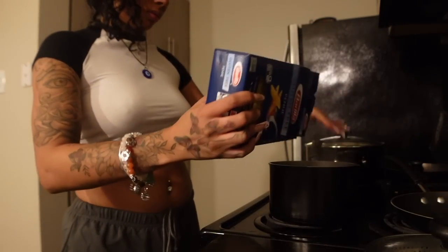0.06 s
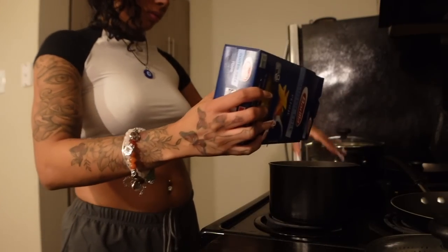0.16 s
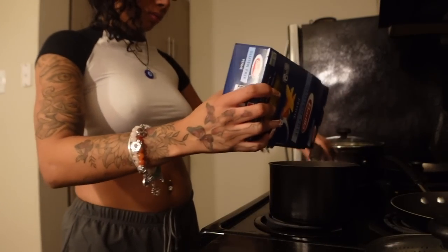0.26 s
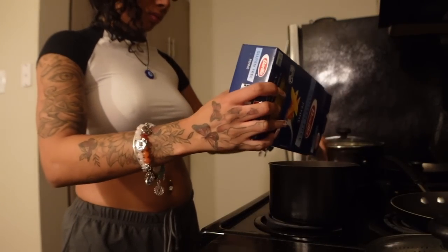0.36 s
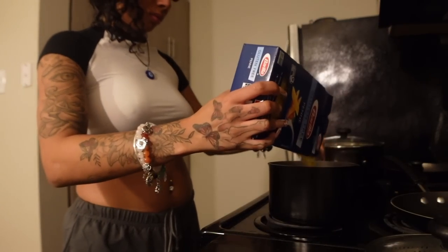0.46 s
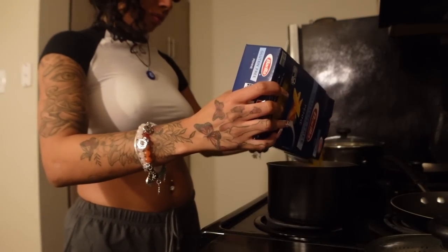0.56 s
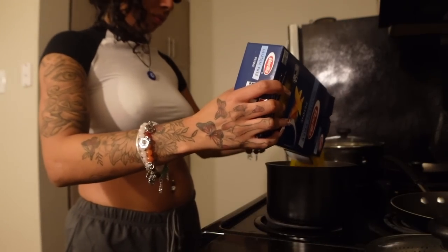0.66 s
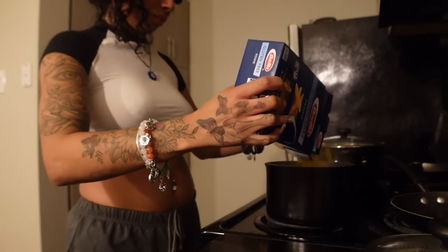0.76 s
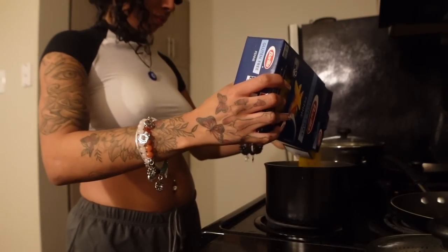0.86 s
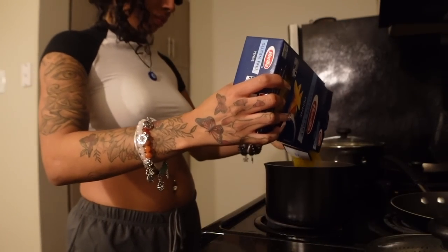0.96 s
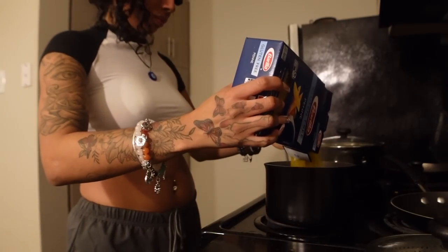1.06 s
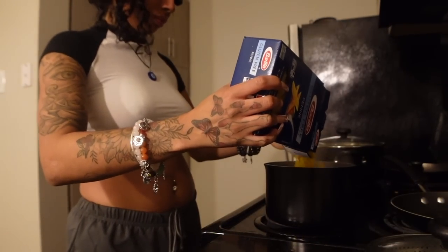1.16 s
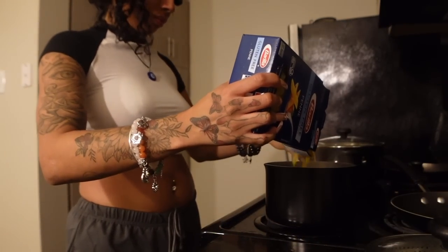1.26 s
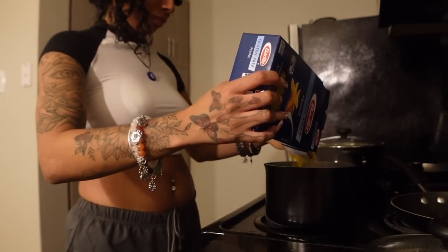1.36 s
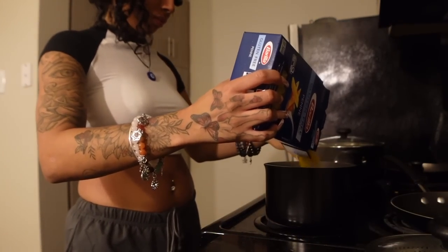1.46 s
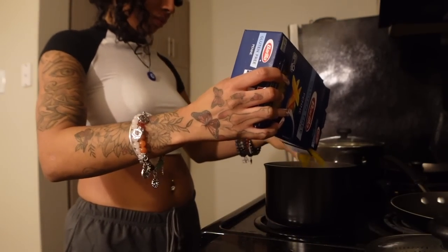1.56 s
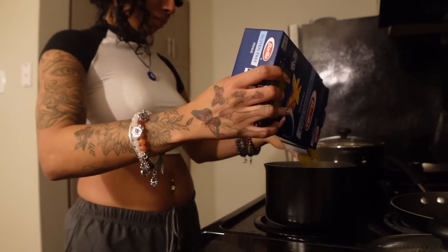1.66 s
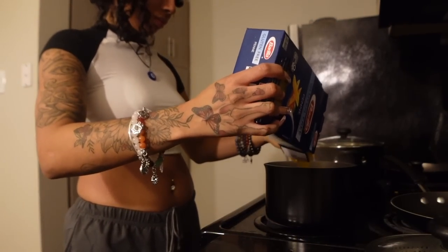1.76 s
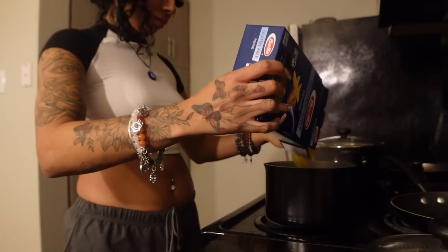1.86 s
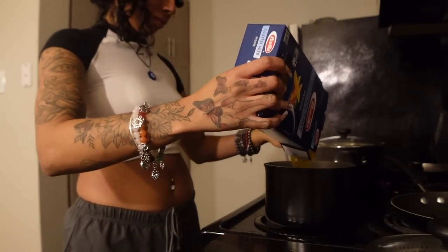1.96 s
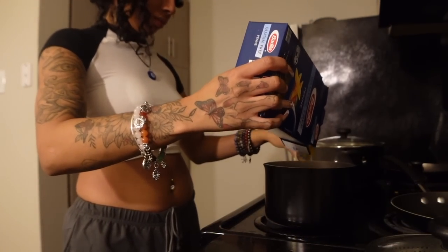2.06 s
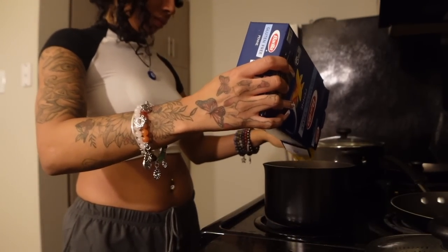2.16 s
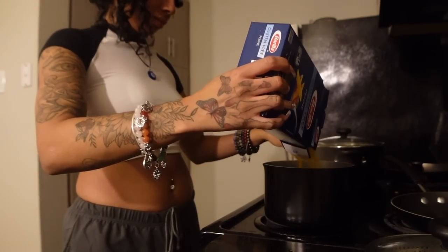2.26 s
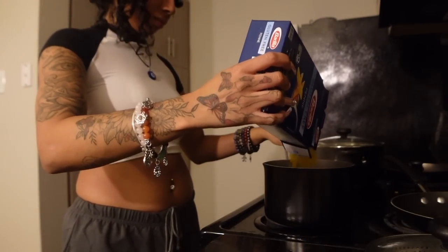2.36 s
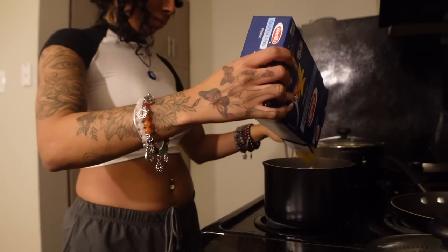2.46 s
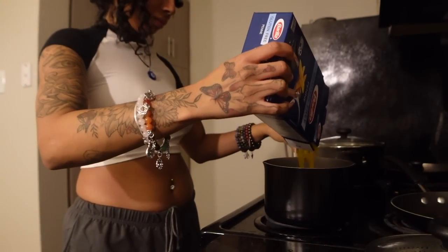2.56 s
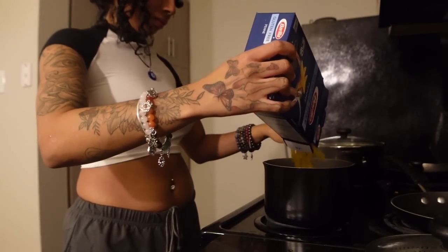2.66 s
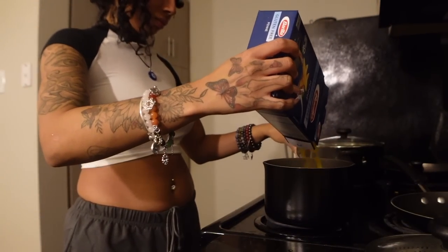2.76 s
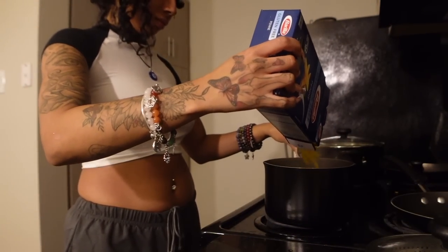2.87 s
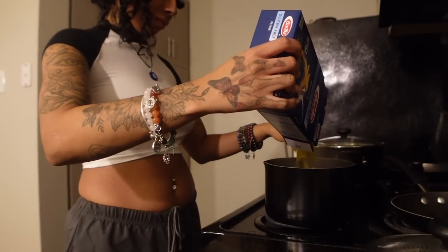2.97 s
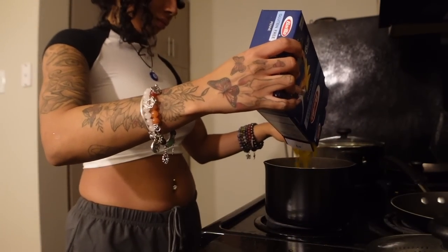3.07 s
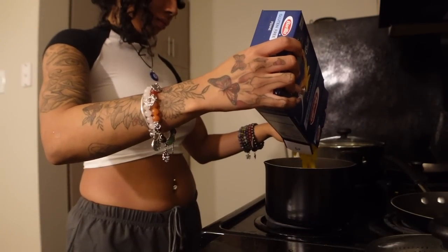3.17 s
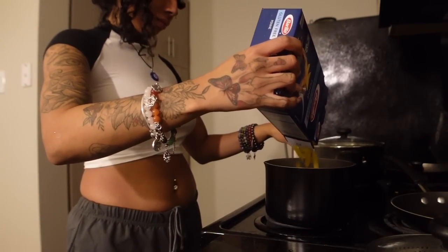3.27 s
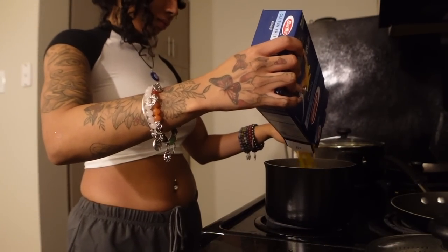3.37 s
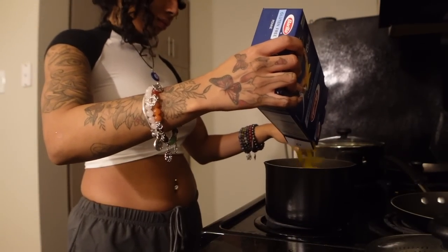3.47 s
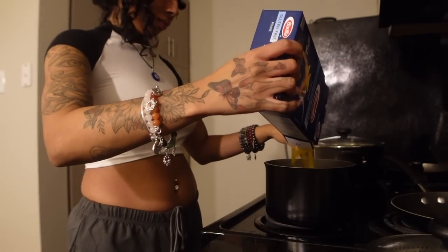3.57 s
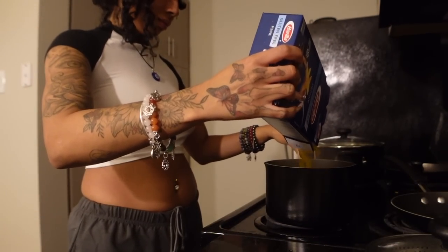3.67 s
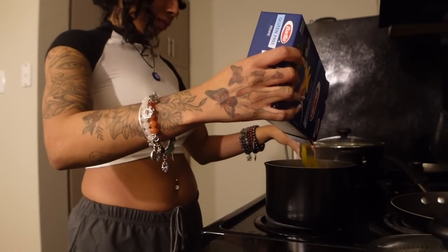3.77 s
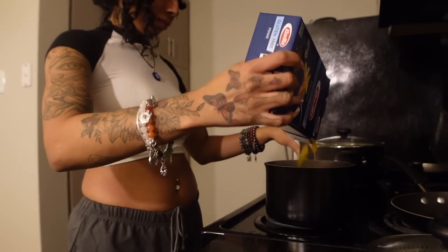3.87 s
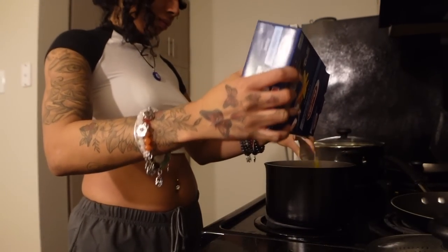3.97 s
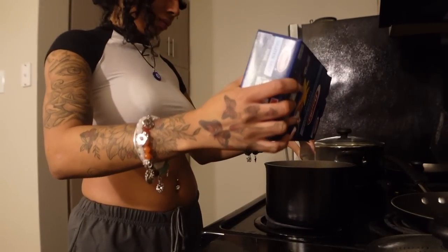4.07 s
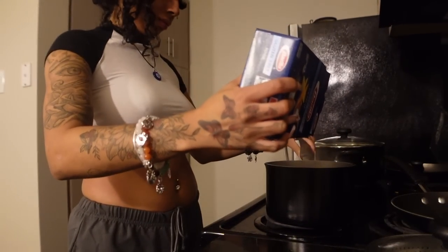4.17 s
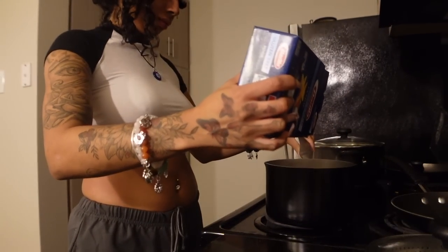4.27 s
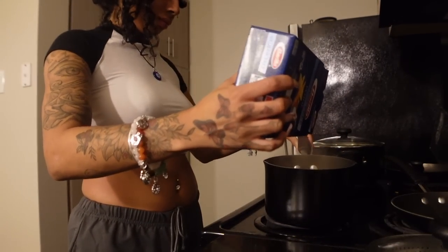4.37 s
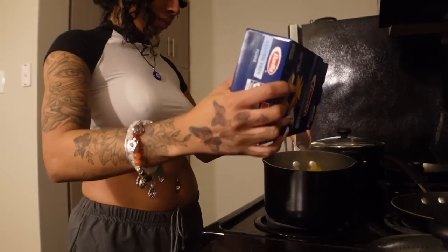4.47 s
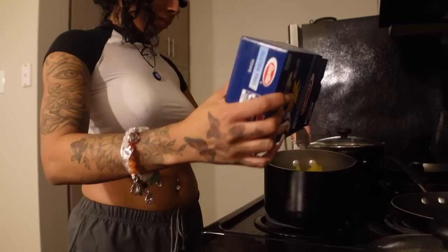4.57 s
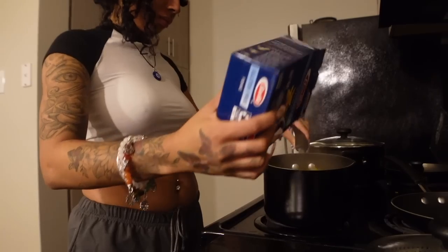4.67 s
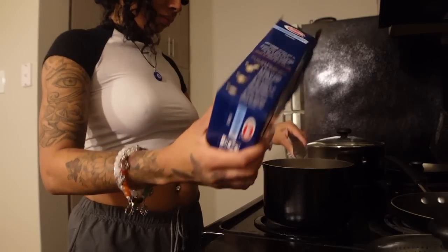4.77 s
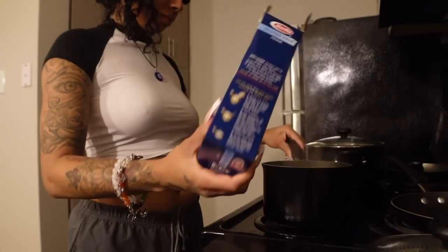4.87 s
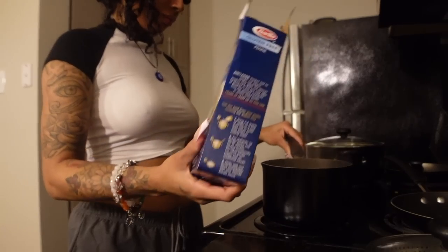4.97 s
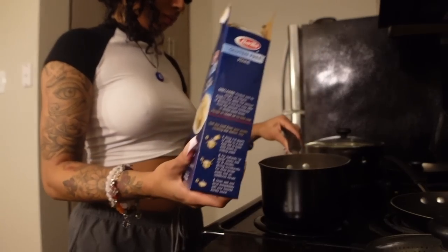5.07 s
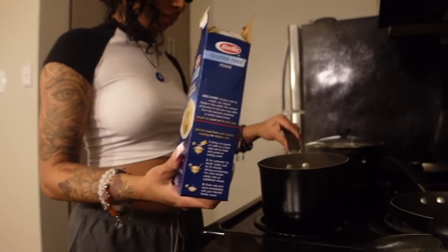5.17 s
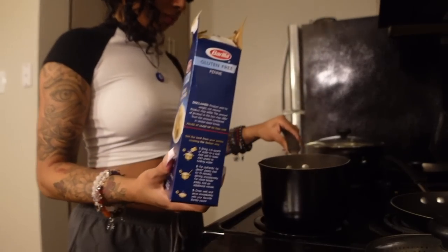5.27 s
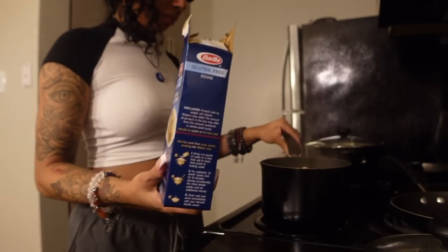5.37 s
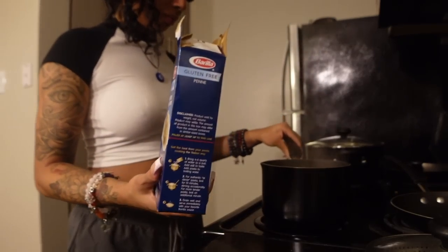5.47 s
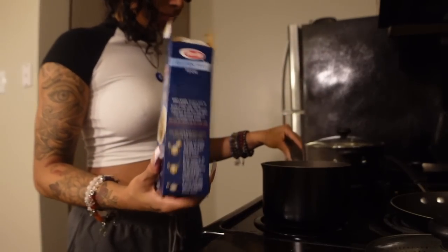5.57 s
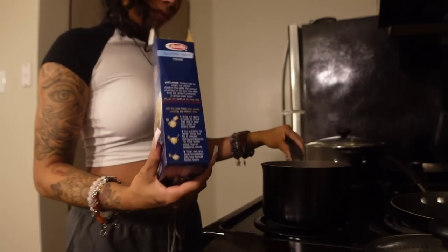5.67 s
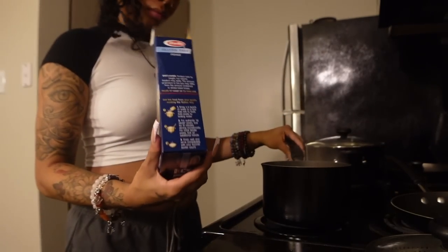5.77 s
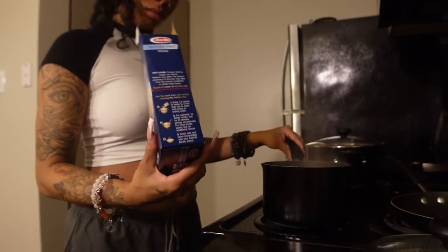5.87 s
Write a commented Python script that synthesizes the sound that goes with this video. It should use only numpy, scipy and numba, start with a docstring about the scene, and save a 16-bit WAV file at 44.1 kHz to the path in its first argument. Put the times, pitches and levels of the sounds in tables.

```python
"""A low kitchen hum and a light knock, then dry pasta is tipped from a cardboard box into a steel pot on a stove;
the box is turned upright and the rest slides back.
Hundreds of small random contacts, each a click and a few damped partials, ring through the box's resonances.
Noise ticks and tube tones clink in the pot and excite its damped modes; knocks, skids and pings stand out singly.
Random decaying echoes give the small kitchen; two close capsules hear the sources a little to the right."""
import sys
import numpy as np
from scipy import signal
from scipy.fft import rfft, irfft
from scipy.io import wavfile
from numba import njit

SR = 44100
rng = np.random.default_rng(int(sys.argv[2]) if len(sys.argv) > 2 else 0)


def master_out(mix):
    """Clip the mix to full scale and print it as 16-bit PCM to the path in sys.argv[1]."""
    frames = np.transpose(np.atleast_2d(mix))
    ceiling = np.clip(frames, -1, 1)
    pcm = np.round(ceiling * 32767).astype(np.int16)
    wavfile.write(sys.argv[1], SR, pcm)


N = 261513


def undb(db):
    """Decibels to gain."""
    return 10 ** (np.asarray(db) / 20)


def rms(x):
    """Root mean square, kept above zero."""
    return np.sqrt(np.mean(x ** 2)) + 1e-12


def curve(rows, column):
    """One dB column of a table as a gain over time, fading to silence outside it."""
    rows, t = np.asarray(rows), np.arange(N) / SR
    outside_s = np.maximum(rows[0, 0] - t, 0) + np.maximum(t - rows[-1, 0], 0)
    return undb(np.interp(t, rows[:, 0], rows[:, column])) * np.exp(-outside_s / .02)


def band(x, lo_hz, hi_hz):
    """Third-order Butterworth band-pass."""
    edges_hz = [lo_hz, min(hi_hz, .48 * SR)]
    return signal.sosfilt(signal.butter(3, edges_hz, 'bandpass', fs=SR, output='sos'), x)


def convolve(x, impulse_response):
    """Play a sound through an impulse response."""
    return signal.fftconvolve(x, impulse_response)[:N]


def response(points, resonances=(), size=8192):
    """Minimum-phase impulse response of a broad spectrum with resonant peaks and dips on it."""
    f = np.maximum(np.arange(size // 2 + 1) * SR / size, 1)
    hz, db = np.transpose(points)
    shape_db = np.interp(np.log(f), np.log(hz), db)
    for centre_hz, width_hz, height_db in resonances:
        shape_db = shape_db + height_db / (1 + (2 * (f - centre_hz) / width_hz) ** 2)
    # folding the cepstrum makes the response causal
    cepstrum = irfft(np.log(undb(shape_db)))
    cepstrum[1:size // 2] *= 2
    cepstrum[size // 2 + 1:] = 0
    return irfft(np.exp(rfft(cepstrum)))


def colour(x, points, resonances=()):
    """Filter by a spectrum and its resonances."""
    return convolve(x, response(points, resonances))


@njit
def rings(at, hz, fade, size, length):
    """A damped sine for each row; fade is the time constant in seconds."""
    out = np.zeros(length)
    for k in range(len(at)):
        start = max(int(at[k] * SR), 0)
        z = size[k] + 0j
        turn = np.exp((2j * np.pi * hz[k] - 1 / fade[k]) / SR)
        for i in range(start, min(length, start + int(6 * fade[k] * SR))):
            z *= turn
            out[i] += z.imag
    return out


def bursts(at, size, fade_s):
    """A short decaying burst of noise at each time."""
    hits = np.zeros(N)
    np.add.at(hits, np.clip((at * SR).astype(int), 0, N - 1), size)
    envelope = signal.lfilter([1], [1, -np.exp(-1 / (fade_s * SR))], hits)
    return envelope * rng.standard_normal(N)


def struck(at, hz, size, modes, fade_s, contact_s, scatter=0.076):
    """A few quickly damped modes for each blow; they swell during contact and vary a little from spot to spot."""
    ratio, db = np.transpose(modes)
    chance = rng.standard_normal((len(at), 2, len(ratio)))
    starts = np.repeat(at, len(ratio))
    # the mode at the pitch itself stays put
    pitches = (np.outer(hz, ratio) * (1 + scatter * chance[:, 0] * (ratio != 1))).ravel()
    sizes = (np.outer(size, undb(db)) * np.sign(chance[:, 1])).ravel()
    fading = rings(starts, pitches, np.full(len(starts), fade_s), sizes, N)
    held = rings(starts, pitches, np.full(len(starts), contact_s), sizes, N)
    return fading - held


def contacts(rate, spread_db, cycles, click, count=18000, order=5):
    """Random collisions, white and of even power: each is a click and a few short partials of a hollow piece."""
    gaps, strength = rng.exponential(size=count), rng.standard_normal(count)
    pitch, sign = rng.random((count, order)), rng.choice([-1., 1.], (count, order))
    at = np.searchsorted(np.cumsum(rate) / SR, np.cumsum(gaps))
    heard = at < N
    at, pitch, sign = at[heard], pitch[heard], sign[heard]
    # dense collisions are each weaker, so power stays even
    size = undb(spread_db * np.minimum(strength[heard], 2)) / np.sqrt(rate[at])
    hz = 250 * 64 ** pitch
    fade_s = np.minimum(cycles / hz, .006)
    sizes = sign * size[:, None] * np.sqrt(hz / fade_s)
    partials = rings(np.repeat(at / SR, order), hz.ravel(), fade_s.ravel(), sizes.ravel(), N)
    clicks = np.bincount(at, size * sign[:, 0], N)
    return partials / rms(partials) + click * clicks / rms(clicks)


# Appliance noise spectrum. Each row: frequency in Hz, relative density in dB per Hz.
KITCHEN_SPECTRUM = [(25, -28), (38, -27), (48, -6), (62, -29), (80, -6), (105, 0), (200, 3.5), (300, -5),
                    (400, -0.5), (600, -13), (950, -12), (1500, -7), (2200, -17), (5000, -29), (15000, -48)]
# Hum partials. Each row: frequency in Hz, level in dB rms.
HUM_PARTIALS = [(118.6, -50), (238, -53.5), (377, -59.5), (1556, -63)]


def background(noise_db=-42.5, side_db=-19):
    """Steady appliance noise with a slightly wavering mains hum."""
    mid, side = (colour(rng.standard_normal(N), KITCHEN_SPECTRUM) for _ in range(2))
    t, hum = np.arange(N) / SR, np.zeros(N)
    for hz, db in HUM_PARTIALS:
        waver_rad = np.cumsum(rng.standard_normal(N)) * 0.00068 * np.sqrt(hz)
        hum += undb(db) * np.sqrt(2) * np.sin(2 * np.pi * hz * t + waver_rad)
    opposed = side / rms(side) * np.array([[1], [-1]])
    return hum + undb(noise_db) * (mid / rms(mid) + undb(side_db) * opposed)


def room(x, early_db, tail_db, early_s=0.0065, low_t60=0.86, high_t60=0.65, count=32):
    """Quick echoes off stove and wall, then the kitchen's short tail; their pattern changes as box and arms move."""
    t = np.arange(int(.6 * SR)) / SR
    low_decay, high_decay = (np.exp(-np.log(1000) * t / t60) for t60 in (low_t60, high_t60))
    out, step = np.zeros(N + len(t)), N // count
    dull = signal.butter(1, 4000, fs=SR, output='sos')
    for k in range(count + 2):
        i = np.arange(max((k - 1) * step, 0), min((k + 1) * step, N))
        if not np.any(np.abs(x[i]) > 1e-5):
            continue
        near, far = rng.standard_normal((2, len(t)))
        early = near * (t > .002) * np.exp(-t / early_s)
        low = signal.sosfilt(dull, far)
        tail = (low * low_decay + (far - low) * high_decay) * (t > .012)
        echoes = undb(early_db) * early / np.linalg.norm(early)
        echoes += undb(tail_db) * tail / np.linalg.norm(tail)
        # equal-power crossfade between patterns
        wet = signal.fftconvolve(x[i] * np.cos(np.pi / 2 * (i / step - k)), echoes)
        out[i[0]:i[0] + len(wet)] += wet
    return out[:N]


# Sideways lean picked up by the capsules. Each row: frequency in Hz, relative share.
LEAN_SHARE = [(250, 0), (550, 0.63), (1100, 1.35), (2000, 0.87), (4200, 1.13), (8000, 1.94), (12000, 0.25)]


def place(x, right_db, early_db, tail_db, side_db):
    """A source in the kitchen; echoes at the two close capsules differ most in bass and high treble, least at 2-5 kHz."""
    mid = x + room(x, early_db, tail_db)
    diffuse_points = [(100, -3.0), (2000, -11.0), (5000, -11.5), (8500, -2.5), (15000, -4.5)]
    diffuse = colour(room(x, early_db, tail_db), diffuse_points) * undb(side_db)
    share = np.interp(np.arange(N // 2 + 1) * SR / N, *np.transpose(LEAN_SHARE))
    lean = np.tanh(right_db * np.log(10) / 40) * irfft(rfft(mid) * share, N)
    side = diffuse - lean
    return np.array([mid + side, mid - side])


# Bead ticks. Each row: time in seconds, level in dB.
BEAD_LEVELS = [(.02, -60), (.09, -56), (.16, -60), (.3, -55)]


def bracelets():
    """Small hard beads of bracelets touch each other: sparse, very bright, faint ticks."""
    touches = contacts(np.full(N, 120.), spread_db=2.0, cycles=8, click=1.4, count=1000)
    ticks = band(touches, 5200, 11000)
    return ticks / rms(ticks) * curve(BEAD_LEVELS, column=1)


# Pieces skidding on cardboard. Each row: start in seconds, level before the envelope in dB, rasp centre in Hz.
SKID_EVENTS = [(0.025, -27, 2280), (0.254, -30, 3270), (5.57, -29.5, 3030), (5.715, -36.5, 3080),
               (5.73, -37, 2700), (5.85, -42, 3400)]


def skids(attack_s=0.0018, fade_s=0.014, span=1.61):
    """A skidding piece rasps at once and slows to rest: band noise reaching a factor span either side."""
    t, out = np.arange(N) / SR, np.zeros(N)
    for at, db, hz in SKID_EVENTS:
        age = np.maximum(t - at, 0)
        rasp = rng.standard_normal(N)
        for _ in range(2):
            rasp = band(rasp, hz / span, hz * span)
        out += undb(db) * rasp / rms(rasp) * np.minimum(age / attack_s, 1) * np.exp(-age / fade_s)
    return out


# Last loose pieces bouncing free of the heap. Each row: start in seconds, relative level in dB, pitch in Hz.
PING_EVENTS = [(3.935, -13.5, 3740), (3.972, -23, 3670), (3.993, -11, 2650), (4.008, -24, 2750),
               (4.016, -26, 3450), (4.046, -28, 2580)]


def pings(ring_s=0.004):
    """Undamped by their neighbours, single hollow pieces give a short clear note."""
    at, db, hz = np.array(PING_EVENTS, float).T.copy()
    return struck(at, hz, undb(db), [(1, 0.5), (1.37, -17)], ring_s, contact_s=.0003)


# Single pieces knocking on the box, the heap or the pot. Each row: start in seconds, relative level in dB,
# panel pitch in Hz, piece pitch in Hz, piece against the whole in dB (capped below).
KNOCK_EVENTS = [(0.026, -17, 1710, 2550, 1), (0.26, -13.5, 1300, 3850, -5), (0.295, -3.5, 1880, 3530, -7),
                (0.312, -12.5, 1000, 3240, -0.5), (.384, -8, 1240, 3550, -9), (.586, -4, 1100, 2330, -5),
                (.636, -6, 1000, 3480, -13), (.667, -11, 1075, 2900, -2), (.749, -2, 895, 2320, -10),
                (.811, -9, 860, 3500, -5), (1.009, -11, 1745, 2750, 1), (1.161, -15, 1840, 3270, -10),
                (1.259, -11, 1870, 2410, -14), (1.287, -4, 718, 3830, -2), (1.404, -14, 1300, 3660, -0.5),
                (1.479, -11, 1300, 4400, -2), (1.548, -10, 1299, 2770, -7), (1.583, -11.5, 1290, 4170, -1),
                (1.626, -6, 1780, 3560, -4), (1.755, -9, 1440, 2700, -15), (1.958, -10, 1920, 3620, 1),
                (1.983, -5, 783, 2600, -5), (1.99, -11, 1300, 3820, 0), (2.127, -16, 1300, 3860, 1),
                (2.178, -9, 1350, 3580, -7), (2.248, -14, 1300, 4100, -0.5), (2.275, -5, 950, 2600, -9),
                (2.31, -8, 1916, 2530, -11), (2.479, -7, 1080, 2760, -2), (2.488, -9, 1300, 3870, -1),
                (2.611, -13, 1860, 2800, -5), (2.696, -6.5, 1890, 3800, -7), (2.865, -5, 1300, 2650, -6),
                (2.988, -11, 1300, 3840, -2), (3.039, -6, 1090, 3300, -6), (3.098, -9.5, 1300, 3870, -0.5),
                (3.164, -6, 1740, 2720, -7), (3.219, -6, 820, 2400, -19), (3.253, -3, 700, 2400, -14),
                (3.297, -9.5, 1300, 3800, -1), (3.378, -9, 1910, 2500, -2), (3.43, -7, 1300, 2830, -11),
                (3.443, -13, 1300, 4320, 1), (3.471, -5, 1740, 2800, -0.5), (3.479, -15, 1360, 2700, -3),
                (3.498, -4, 720, 3000, -5), (3.534, -6, 1720, 3060, -3), (3.677, -6, 1720, 2930, -4),
                (3.771, -9.5, 1730, 2940, -10), (3.789, -9, 1399, 4160, -4), (3.833, -14, 1130, 3270, -4),
                (3.935, -11, 2020, 3750, -8.5), (4.9507, -0.5, 855, 3250, -2.5),
                (4.977, 0, 1150, 3870, -10), (4.992, -3, 1330, 3200, -1), (5.0105, -3.5, 730, 3050, -6.5),
                (5.07, -2, 1230, 3270, -13), (5.079, -4.5, 1370, 4630, -18), (5.089, -4, 1350, 3000, -17),
                (5.098, -7.5, 1400, 4700, 0), (5.105, -2.5, 690, 3000, -12), (5.1153, -4, 1260, 3940, -2.5),
                (5.163, -1, 1180, 2700, -9.5), (5.187, 0.5, 1920, 2780, -8.5), (5.196, -2, 660, 2320, -9),
                (5.214, -3, 1200, 3700, -8.5), (5.223, -14, 1300, 4350, -1), (5.234, -2.5, 750, 2700, -7),
                (5.249, 0, 860, 4180, -11), (5.2898, -2.5, 880, 2940, -4), (5.2923, 0, 1320, 3130, -9),
                (5.3035, -3.5, 1330, 2920, -21), (5.3187, -4.5, 1310, 2510, -17),
                (5.332, -11, 1340, 2900, -26), (5.347, -2.5, 1240, 2840, -12),
                (5.373, -21, 1190, 2900, -16), (5.473, -27, 1220, 2600, 3), (5.529, -25, 1260, 2700, -12),
                (5.588, -12, 910, 2760, -10), (5.602, -17, 830, 2890, -17), (5.675, -23, 744, 2710, -12),
                (5.715, -19, 800, 3230, -10), (5.75, -21, 1260, 2700, -11), (5.85, -22.5, 770, 3210, -13),
                (5.875, -19, 800, 2800, -22), (5.899, -20, 850, 2800, -22), (5.912, -15, 900, 2830, -19.5)]
# Cardboard panel modes. Each row: nominal multiple of the panel pitch, relative level in dB.
PANEL_MODES = [(.68, -11), (1, -2.5), (1.38, -10)]
# Hollow piece modes. Each row: nominal multiple of the piece pitch, relative level in dB.
PIECE_MODES = [(.83, -12.5), (1, -3), (1.27, -12.5), (1.8, -19.5)]


def knocks(panel_db=2.5, piece_db=3.0, snap_db=-6, scuff_db=-21, panel_s=0.0024, piece_s=0.0018):
    """A piece snaps, rings and scuffs; the cardboard panel answers lower but radiates no bass."""
    at, db, panel_hz, piece_hz, share_db = np.array(KNOCK_EVENTS, float).T.copy()
    share = np.minimum(undb(share_db), .95)
    panel_size, piece_size = undb(db + panel_db) * (1 - share), undb(db + piece_db) * share
    panel = struck(at, panel_hz, panel_size, PANEL_MODES, panel_s, contact_s=0.00035)
    piece = struck(at, piece_hz, piece_size, PIECE_MODES, piece_s, contact_s=0.00026)
    snap = band(bursts(at, undb(db + snap_db) * share, 0.0011), 2500, 6600)
    scuff = band(bursts(at, undb(db + scuff_db) * (.5 + share), 0.013), 580, 5900)
    return band(panel + piece + snap + scuff, 470, 20000)


# Steel pot modes. Each row: centre of the cluster in Hz, relative level in dB, t60 in seconds.
POT_MODES = [(2640, 4, 0.33), (3180, -10, 0.6), (3700, -7, 0.25), (4150, -19, .4), (5390, 0, 0.6),
             (5870, -4, 1), (7440, -10, .1), (9400, -8, .08), (10200, -9, .07), (13500, -8, .14)]


def pot_wall(split=0.088, count=70):
    """The pot's ring: the load of pasta and the handles split each mode into a cluster of close ones."""
    hz, db, t60 = np.repeat(np.array(POT_MODES, float), count, axis=0).T
    chance = rng.standard_normal((len(hz), 2))
    split_hz = hz * (1 + split * chance[:, 0])
    sizes = undb(db) * np.sign(chance[:, 1])
    return rings(np.zeros(len(hz)), split_hz, t60 / np.log(1000), sizes, SR)


# Stream landing in the pot. Each row: time in seconds, relative level in dB.
STREAM_LEVELS = [(.39, -43), (.47, -37.5), (.9, -31.5), (1.2, -36), (1.7, -41), (2.35, -39), (2.95, -42.5),
                 (3.15, -37), (3.87, -38.5), (3.9, -49), (3.95, -42), (3.98, -39.5), (4.04, -56)]
# Hardest pieces hitting the pot. Each row: start in seconds, relative level in dB, piece pitch in Hz.
CLINK_EVENTS = [(.954, -12.5, 7600), (1.479, -19, 10100), (1.582, -20, 7940), (1.99, -15, 8100),
                (2.486, -19, 7710), (2.696, -17.5, 7800), (2.728, -18.5, 9500), (2.861, -17, 6800),
                (3.05, -17.5, 7990), (3.096, -26, 9200), (3.204, -11, 8600), (3.26, -19, 8000),
                (3.316, -17, 9520), (3.378, -19, 9030), (3.445, -13, 7800), (3.471, -17, 11300),
                (3.55, -11.5, 7050), (3.617, -18, 6900), (3.677, -16, 8960), (3.744, -18.5, 7600),
                (3.787, -15, 8460), (3.878, -17, 7000), (3.924, -19, 9300), (3.944, -24, 10200),
                (3.969, -17, 8670), (3.982, -13, 9550), (4.035, -22.5, 6060)]
# Broad spectrum of pieces landing. Each row: frequency in Hz, relative level in dB.
LANDING_SPECTRUM = [(500, -41), (2000, 6), (3700, 10.5), (5500, 6), (7000, -0.5), (9500, -2.5),
                    (11500, -7.5), (13800, -7), (15800, -14)]
# Bright resonances of the hollow tubes. Each row: centre in Hz, width in Hz, height in dB.
TUBE_RESONANCES = [(6000, 1100, 1.8), (8740, 2100, 3.3), (10100, 590, 2.1)]


def landing(stream_db=-4.5, tick_db=-8, tube_db=-8, pot_db=-17, bounce_db=-3):
    """The falling stream clicks in the pot, its hardest pieces bounce once, and the wall is left ringing."""
    # hard, dry pieces ring for only a few cycles
    stream = contacts(np.full(N, 340.), spread_db=0.5, cycles=6, click=0.9)
    stream = colour(stream, LANDING_SPECTRUM, TUBE_RESONANCES)
    stream = stream / rms(band(stream, 7000, 15000))
    at, db, hz = np.array(CLINK_EVENTS, float).T.copy()
    again = at + rng.uniform(0.0032, 0.011, len(at))
    ticks = bursts(at + 0.0016, undb(db + tick_db), 0.0024)
    ticks += bursts(again, undb(db + tick_db + bounce_db), 0.0016)
    # the hardest blows have the shortest contact, so they reach furthest up
    ticks = colour(ticks, LANDING_SPECTRUM, list(TUBE_RESONANCES) + [(13500, 5000, 1.6)])
    tubes = rings(at + .002, hz, np.full(len(at), .002), undb(db + tube_db), N)
    blows = stream * curve(STREAM_LEVELS, column=1) * undb(stream_db) + ticks + tubes
    ring = convolve(blows, pot_wall())
    return blows + ring * undb(pot_db) * rms(blows) / rms(ring)


# Clumps of pasta giving way. Each row: start in seconds, relative rattle level in dB,
# relative crisp contact level in dB.
SURGE_EVENTS = [(0.028, -39, -45), (0.198, -38, -38), (1.005, -24.5, -31.5), (1.134, -26, -27.5),
                (1.245, -27, -25), (1.444, -29, -24), (1.81, -26.5, -23), (2.3, -20.5, -22.5),
                (2.459, -26, -25), (3.16, -25, -25), (3.24, -23, -42), (3.39, -26, -24),
                (3.44, -27.5, -23.5), (3.685, -22, -21.5), (3.764, -27, -36), (3.958, -36, -48),
                (5.034, -27, -30), (5.185, -20, -27), (5.58, -31, -54)]


def jostling(motion, contact_db=-7.0, sharpening=1.09, attack_s=.012, fade_s=.035):
    """Rattle and crisp contact gains: both follow the flow, contacts more steeply; each clump adds a quick swell."""
    t, flow = np.arange(N) / SR, curve(motion, column=1)
    rattle = flow
    crisp = undb(contact_db) * flow.max() * (flow / flow.max()) ** sharpening
    for at, rattle_db, crisp_db in SURGE_EVENTS:
        if motion[0][0] <= at <= motion[-1][0]:
            fade = np.exp(-np.maximum(t - at - attack_s, 0) / fade_s)
            swell = np.clip((t - at) / attack_s, 0, 1) * fade
            rattle = np.hypot(rattle, undb(rattle_db) * swell)
            crisp = np.hypot(crisp, undb(crisp_db) * swell)
    return rattle, crisp


# Broad spectrum of pasta rattling on cardboard. Each row: frequency in Hz, relative level in dB.
RATTLE_SPECTRUM = [(60, -65.5), (150, -17.5), (300, -14.5), (480, -11.5), (680, -2), (1100, -1.5),
                   (2000, -3.5), (3300, -6.5), (5000, -15.5), (7000, -24), (10000, -28.5), (12000, -41),
                   (15500, -43)]


def box(x, states, count=70, size=2048, bend_share=.05, bend_db=1.5):
    """The box's resonances pass from one state (s, resonances) to the next and bend as the pasta shifts."""
    out, step = np.zeros(N + size), N // count
    times = [at for at, _ in states]
    for k in range(count + 2):
        peaks = []
        for weights, (_, resonances) in zip(np.eye(len(states)), states):
            weight = np.interp(k * step / SR, times, weights)
            chance = rng.standard_normal((len(resonances), 2))
            for (hz, width_hz, db), (bend, swell) in zip(resonances, chance):
                peaks.append((hz * (1 + bend_share * bend), width_hz, weight * (db + bend_db * swell)))
        i = np.arange(max((k - 1) * step, 0), min((k + 1) * step, N))
        faded = x[i] * np.cos(np.pi / 2 * (i / step - k)) ** 2
        part = signal.fftconvolve(faded, response(RATTLE_SPECTRUM, peaks, size=size))
        out[i[0]:i[0] + len(part)] += part
    return out[:N]


def tumble(motion, states, per_second, spread_db, gain_db, crisp_db, early_crisp_db, top_db, hardness,
           creep=.4):
    """Pieces jostle in the box; the faster they move, the more collide and the sharper each contact is."""
    rattle, crisp = jostling(motion)
    rate = per_second * (creep + np.sqrt(rattle / rattle.max()))
    x = box(contacts(rate, spread_db, cycles=6.4, click=1.51), states)
    early = np.interp(np.arange(N) / SR, [states[0][0], states[-1][0]], [1, 0])
    body, no_top = (signal.sosfiltfilt(signal.butter(2, hz, fs=SR, output='sos'), x) for hz in (2500, 6800))
    top = (x - no_top) * undb(top_db) * (crisp / crisp.max()) ** hardness
    rattle = rattle / rms(band(x, 500, 2000))
    crisp = crisp / rms(band(x, 3000, 6000))
    crisp_gain = undb(crisp_db + early * early_crisp_db)
    return undb(gain_db) * (body * rattle + crisp_gain * (no_top - body + top) * crisp)


# Creep, slide back and settling. Each row: time in seconds, relative rattle level in dB.
SLIDE_MOTION = [(4.59, -57), (4.64, -45), (4.7, -38.5), (4.78, -34.5), (4.84, -29.5), (4.93, -28.5),
                (5.0, -26), (5.07, -23.5), (5.14, -28), (5.26, -27), (5.33, -32), (5.39, -39.5),
                (5.52, -47), (5.66, -45.5), (5.8, -41.5), (5.93, -37)]
# Resonances of the tilted, then the upright box. Each row: nominal centre in Hz, width in Hz, nominal height in dB.
TILTED_BOX = [(240, 130, -3), (646, 250, 4), (820, 99, 2), (1049, 69, 4), (1400, 130, 4), (1570, 210, -8),
              (1770, 180, 5.5), (2260, 85, 1), (2540, 150, 3), (3600, 96, -2), (5200, 120, 4)]
UPRIGHT_BOX = [(197, 87, 8.5), (504, 170, 6), (690, 130, 6), (960, 110, -7.5), (1240, 310, 5.5),
               (1520, 170, -3), (2060, 170, 3), (2470, 720, -6), (3770, 660, -5.5), (9400, 6600, -1)]


def slide():
    """Pasta creeps, slides back all at once as the box is righted, and settles."""
    return tumble(SLIDE_MOTION, [(4.9, TILTED_BOX), (5.1, UPRIGHT_BOX)], per_second=1500, spread_db=0.5,
                  gain_db=3.0, crisp_db=1.8, early_crisp_db=-1.5, top_db=11.0, hardness=0.51)


# Flow in the tilted box, strong again when it is raised. Each row: time in seconds, relative rattle level in dB.
POUR_MOTION = [(0, -40), (.21, -37.5), (.31, -27), (.45, -21), (.74, -20.5), (1, -20), (1.25, -20),
               (1.39, -24), (1.64, -23.5), (1.8, -22), (1.98, -24), (2.15, -23), (2.8, -22), (3.08, -20.5),
               (3.3, -19), (3.7, -25), (3.84, -33.5), (3.92, -38), (3.98, -36), (4.05, -49.5)]
# Resonances of the full box, then as its last third runs out. Each row: nominal centre in Hz, width in Hz,
# nominal height in dB.
FULL_BOX = [(402, 44, 7.5), (765, 140, -0.5), (1040, 240, 2.1), (1370, 180, 2), (1620, 100, -1.5),
            (1825, 170, 3.5), (2280, 360, 1.5), (3480, 110, -5), (3870, 250, 0.5)]
EMPTYING_BOX = [(236, 130, -4), (730, 320, 4), (830, 77, -1), (1380, 87, 5), (1537, 160, -15),
                (1840, 330, 6.5), (2300, 110, -4), (3000, 540, 2), (3570, 96, -7), (4070, 730, -1),
                (5020, 220, 8.5)]


def pour():
    """Pasta rattles out while the box's resonances pass from full through tilted to emptying."""
    states = [(.9, FULL_BOX), (2.4, TILTED_BOX), (3.15, EMPTYING_BOX)]
    return tumble(POUR_MOTION, states, per_second=1000, spread_db=2.0,
                  gain_db=0.5, crisp_db=-1.0, early_crisp_db=1.0, top_db=1.0, hardness=0.14)


def scene():
    """Pouring, landing, sliding back, single knocks, skids, pings and bracelets, over the kitchen's hum."""
    return (background()
            + place(landing() + bracelets(), right_db=3.0, early_db=1.0, tail_db=-1.5, side_db=-4.5)
            + place(pings(), right_db=3.0, early_db=-10, tail_db=-14, side_db=-4)
            + place(knocks() + skids(), right_db=2.0, early_db=-7.5, tail_db=-6.5, side_db=-19)
            + place(slide(), right_db=3.0, early_db=-6.5, tail_db=-10.5, side_db=-1.5)
            + place(pour(), right_db=3.5, early_db=-9.5, tail_db=-5.5, side_db=-6.0))


def record(dry, top_hz=15700):
    """The recorder rounds the highest peaks and cuts the top."""
    rounded = np.tanh(.7 * dry) / .7
    return signal.sosfilt(signal.ellip(10, .2, 80, top_hz, fs=SR, output='sos'), rounded)


dry = scene()
out = record(dry)
master_out(out)
```